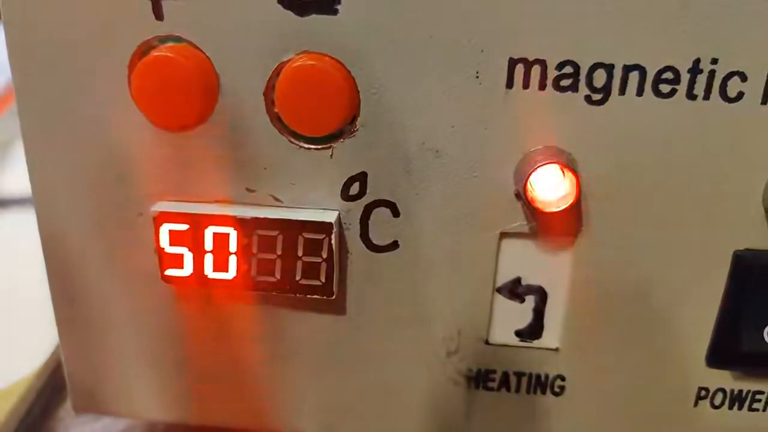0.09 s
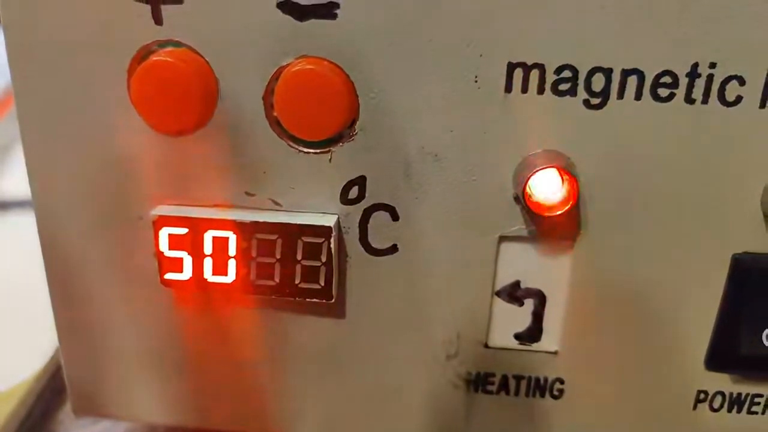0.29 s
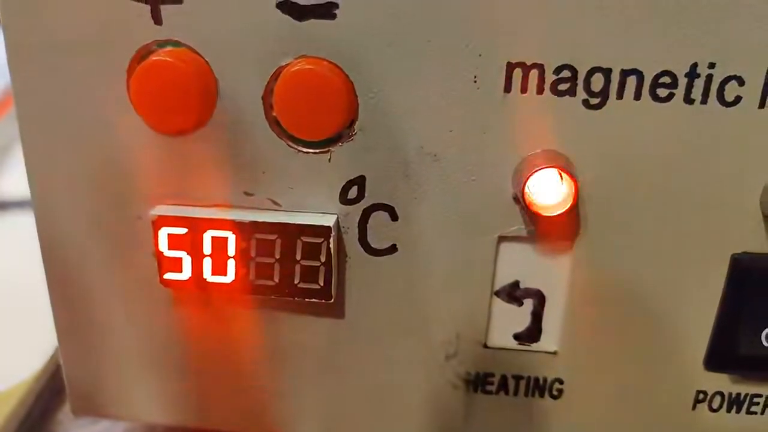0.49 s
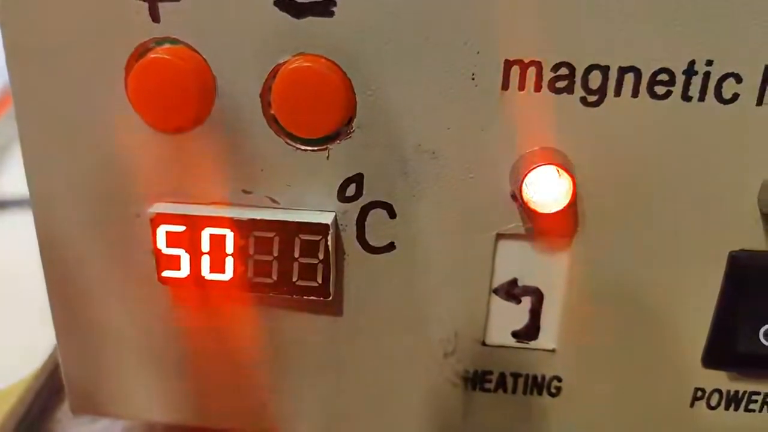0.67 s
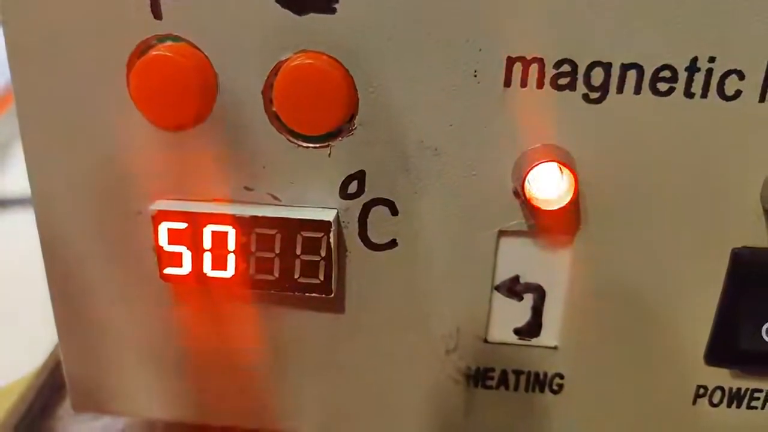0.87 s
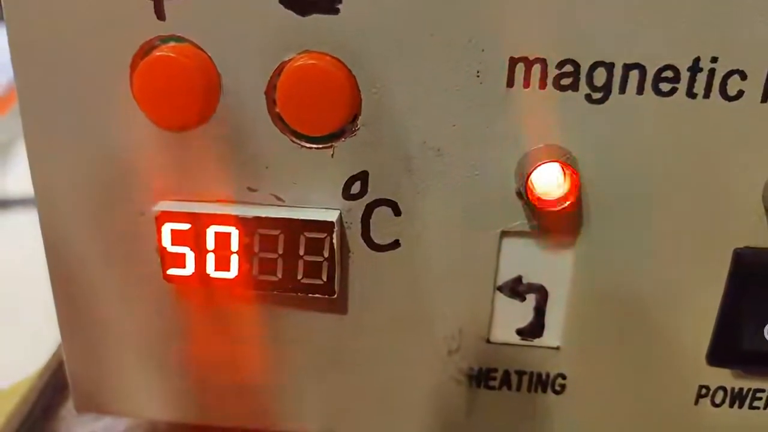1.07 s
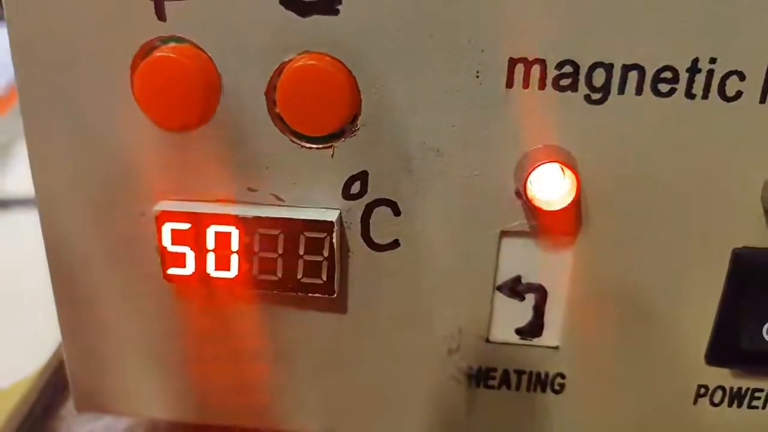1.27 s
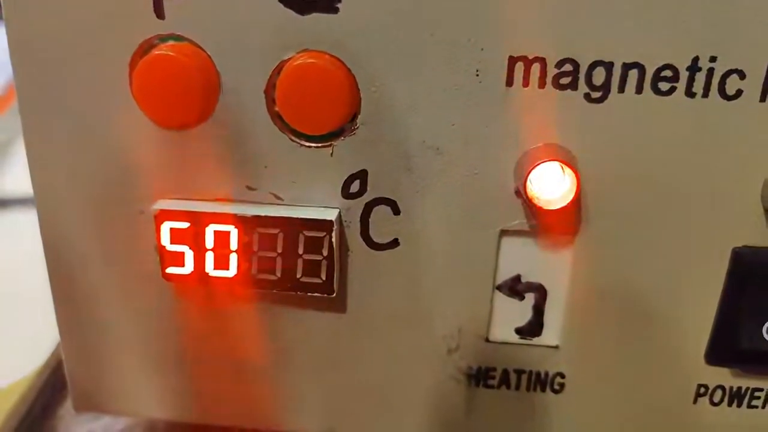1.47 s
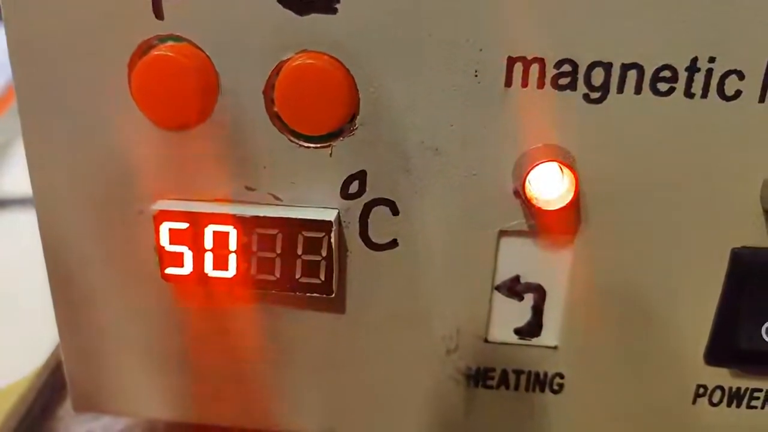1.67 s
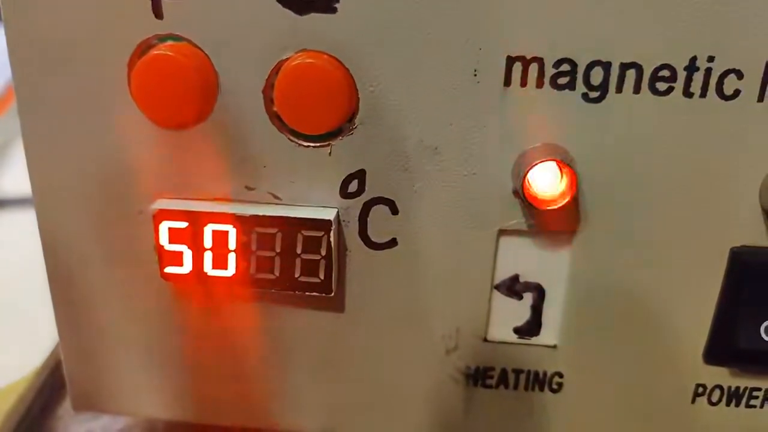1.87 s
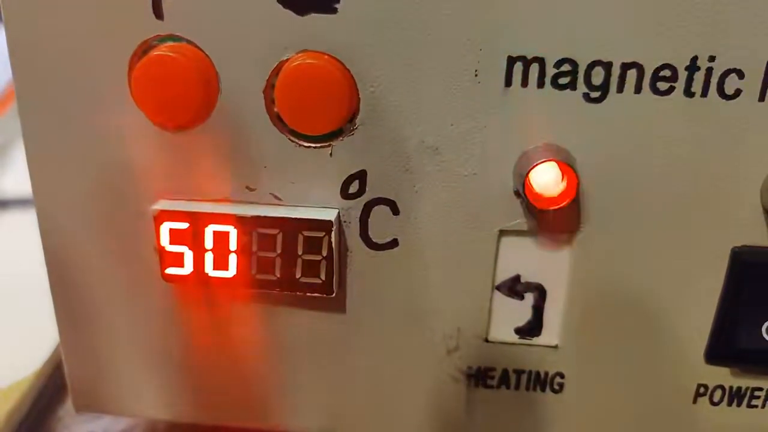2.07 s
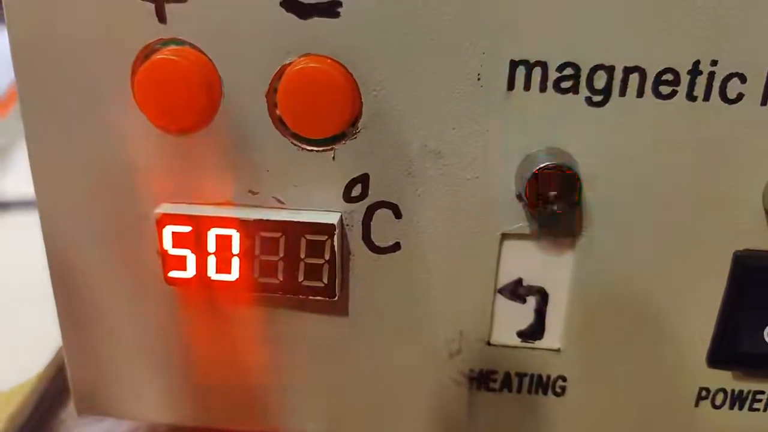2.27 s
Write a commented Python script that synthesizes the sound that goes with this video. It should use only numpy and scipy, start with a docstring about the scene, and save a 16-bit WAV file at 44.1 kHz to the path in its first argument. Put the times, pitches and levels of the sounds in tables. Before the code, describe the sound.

Close stereo pickup of a relay chattering in a heater controller: sparse ticks first, quickly thickening into a dense dry rattle, stopping near the end, with quiet motor hum and whirr underneath indoors.

```python
"""A relay in a heater controller's metal case ticks faintly, clicks a few times, then chatters in a rapid run.
Sharp ticks and longer bursts are random bounces ringing the relay's bright resonances; each also knocks
the case's duller resonances. Under them a motor hums in low sine lines and whirrs in two narrow noise bands,
over banded background noise. The clicks leave a short noise tail for the small room, all in stereo."""
import sys
import numpy as np
from scipy import signal
from scipy.io import wavfile
from scipy.ndimage import uniform_filter1d

SR = 44100
rng = np.random.default_rng(int(sys.argv[2]) if len(sys.argv) > 2 else 0)


def wav_record(signal):
    """Record a signal, one row per channel, as 16-bit PCM in the file named by sys.argv[1]."""
    frames = np.transpose(np.atleast_2d(signal))
    bounded = np.clip(frames, -1, 1)
    # unit amplitude maps onto the largest positive 16-bit level
    quanta = np.round(bounded * 32767).astype(np.int16)
    wavfile.write(sys.argv[1], SR, quanta)


N = 101430  # length in samples
STRENGTH_SPREAD_DB = 2  # each contact favours other resonances


def from_db(db):
    """Amplitude gain of a level in dB."""
    return 10 ** (np.asarray(db) / 20)


def rms_one(x):
    """Scale to rms 1."""
    return x / np.sqrt(np.mean(x ** 2) + 1e-20)


def at_hz(points, hz):
    """Read a table between its points on a log-frequency axis."""
    table_hz, values = np.array(points).T
    return np.interp(np.log(hz), np.log(table_hz), values)


def drift(rate_hz):
    """Slow random wander of rms 1: noise through a double low-pass pole, computed at every 40th sample."""
    step, settle = 40, 2000
    pole = np.exp(-2 * np.pi * rate_hz * step / SR)
    noise = rng.standard_normal(N // step + settle + 2)
    slow = signal.lfilter([1], [1, -2 * pole, pole * pole], noise)[settle:]
    return np.interp(np.arange(N) / step, np.arange(len(slow)), rms_one(slow))


def resonance(x, hz, width_hz):
    """Two-pole band-pass with a gain of about 1 at its peak."""
    r = np.exp(-np.pi * width_hz / SR)
    feedback = [1, -2 * r * np.cos(2 * np.pi * hz / SR), r * r]
    return signal.lfilter([(1 - r * r) / 2, 0, (r * r - 1) / 2], feedback, x + 1e-18)


def pair(alike, pan_db, mid, side):
    """Left and right from a shared and an opposed part; a positive pan leans left."""
    alike = np.clip(alike, 0, 1)
    pan = from_db([[pan_db / 2], [-pan_db / 2]])
    stereo = np.sqrt(1 + alike) * mid + np.sqrt(1 - alike) * side * [[1], [-1]]
    return pan * stereo / np.sqrt(1 + alike)


def relay():
    """Contacts meet in sharp ticks and bouncing bursts, each a bright click and a knock of the case."""
    # sharp ticks of the contacts meeting: start_s, level_db
    ticks = [(0.0072, -43.5), (0.1396, -48.5), (0.237, -23.5), (0.2387, -26.5), (0.313, -20.5),
             (0.319, -26.5), (0.4044, -21.5), (0.4111, -28), (0.5343, -22), (0.5464, -22), (0.6037, -22),
             (0.6158, -25), (0.6236, -20), (0.6394, -27.5), (0.6927, -20.5), (0.6974, -22.5), (0.7254, -21),
             (0.7355, -20.5), (0.737, -34), (0.7564, -23), (0.7587, -20), (0.7598, -25), (0.8195, -24.5),
             (0.8249, -20), (0.8373, -26), (0.8421, -27), (0.8514, -18), (0.864, -17.5), (0.8982, -25),
             (0.9094, -19), (0.9548, -29), (0.9568, -18.5), (0.9648, -23.5), (0.9858, -28), (0.9925, -34),
             (1.0231, -22), (1.0318, -16), (1.0379, -19), (1.04, -22), (1.0633, -18.5), (1.1092, -18.5),
             (1.1145, -20), (1.122, -20), (1.128, -27), (1.1392, -20), (1.1544, -23), (1.1598, -16.5),
             (1.1756, -17.5), (1.1999, -22), (1.211, -19.5), (1.2619, -26), (1.2891, -26), (1.2941, -22),
             (1.3148, -21), (1.33, -24.5), (1.356, -18), (1.3806, -29), (1.3831, -16), (1.4075, -23),
             (1.4173, -25), (1.4213, -19), (1.4357, -23), (1.441, -16.5), (1.4789, -35), (1.4796, -17),
             (1.491, -30), (1.512, -26), (1.5472, -20.5), (1.6039, -19), (1.609, -21), (1.6191, -27),
             (1.6219, -16.5), (1.6345, -26.5), (1.6571, -19.5), (1.685, -20), (1.687, -28), (1.6941, -17.5),
             (1.7058, -19.5), (1.748, -18.5), (1.7615, -21.5), (1.7785, -29), (1.7804, -17.5),
             (1.7822, -34), (1.7962, -19.5), (1.8053, -24), (2.0005, -18.5)]
    # bursts of bouncing: peak_s, level_db, fall_ms (limited below)
    bursts = [(0.2484, -34, 8.1), (0.3694, -32, 7.2), (0.4075, -37.5, 10.4), (0.4618, -31.5, 13.2),
              (0.508, -39.5, 12), (0.536, -30.5, 7.3), (0.5568, -31, 9.3), (0.601, -29, 14.5),
              (0.639, -31.5, 15), (0.664, -27.5, 8.5), (0.693, -33.5, 9.1), (0.727, -29, 7.7),
              (0.788, -31.5, 13.0), (0.7975, -29, 22), (0.8201, -25.5, 14.5), (0.845, -31, 13.0),
              (0.861, -29.5, 11.6), (0.8815, -30.5, 6.1), (0.8965, -32, 12), (0.907, -33, 3.5),
              (0.9271, -28.5, 3.2), (0.9424, -32, 18), (0.9853, -29, 18), (1.0057, -31.5, 10),
              (1.0215, -31, 15), (1.0384, -31.5, 12), (1.055, -25, 2.3), (1.059, -31, 11),
              (1.1153, -29, 14), (1.1332, -29.5, 5.7), (1.157, -31, 15), (1.1813, -28, 4.2),
              (1.196, -30.5, 7.9), (1.245, -31, 12), (1.2596, -30.5, 6.8), (1.2776, -26, 6.1),
              (1.294, -28.5, 13.6), (1.3116, -34, 8.8), (1.326, -28.5, 7), (1.3566, -29.5, 16),
              (1.376, -34.5, 14.5), (1.4076, -28, 12.3), (1.4343, -27.5, 9.1), (1.4395, -42, 13.0),
              (1.481, -30.5, 9.7), (1.5126, -30, 13.2), (1.5457, -27, 4.4), (1.5581, -22.5, 3.6),
              (1.6, -36, 17), (1.632, -31, 7.2), (1.657, -31.5, 14.4), (1.6774, -27, 2.4),
              (1.6846, -33.5, 13.6), (1.7319, -21, 3), (1.7493, -30.5, 12.8), (1.7988, -28, 9.7),
              (1.822, -31, 13.0), (1.8633, -31, 9.4), (1.8855, -30.5, 16.5), (1.9208, -31, 8),
              (1.959, -31, 7.6), (1.999, -34, 3.9), (2.0096, -29.5, 4.7), (2.044, -32, 7.3),
              (2.1133, -48.5, 8.2)]
    tick_fall_ms = 0.88
    events = [(s, db, tick_fall_ms) for s, db in ticks] + bursts
    times_s, level_db, fall_ms = np.transpose(events)
    fall_s = np.clip(fall_ms, 0.3, 15) / 1000
    is_tick = np.arange(len(times_s)) < len(ticks)
    return click(times_s, level_db, fall_s) + knock(times_s, level_db, fall_s, is_tick)


def click(times_s, level_db, fall_s):
    """Bounces ring the relay's bright parts and a very broad snap; the left side is a moment late."""
    # bright resonances of the relay: pitch_hz, width_hz, level_db
    relay_modes = [(3083, 382, -6.5), (3584, 101, -1.5), (4062, 158, -4), (4803, 302, -1), (5892, 363, 4.5),
                   (8010, 516, -2.5), (9410, 386, 1), (10150, 340, -8), (12400, 1430, -2.5),
                   (14100, 300, -4), (14750, 810, -3)]
    snap = (8900, 16600, -13)  # pitch_hz, width_hz, level_db
    left_lag_s = 0.00007
    ringing = struck(times_s, level_db, fall_s, relay_modes + [snap])
    stereo = pair(0.2, 2, *ringing)
    stereo[0] = np.roll(stereo[0], int(left_lag_s * SR))
    return signal.sosfilt(signal.butter(2, 2900, "high", fs=SR, output="sos"), stereo)


def knock(times_s, level_db, fall_s, is_tick):
    """The case rings just after each contact: one late blow per tick, a run of bounces per burst."""
    # resonances of the case: pitch_hz, width_hz, level_db
    case_modes = [(329.5, 69, -9.5), (605, 64, -9), (822, 64, 1.5), (1026, 134, -2.5), (1307, 47, -14),
                  (1672, 238, -12)]
    burst_below_db, burst_lag_s = 8.5, 0.00048
    tick_below_db, tick_lag_s = 11.5, 0.002986
    # hard clicks knock the case little more than soft ones
    knee_db, squeeze = -33.5, 0.69
    level_db = level_db - squeeze * np.maximum(level_db - knee_db, 0)
    is_burst = ~is_tick
    burst_knock = struck(times_s[is_burst] + burst_lag_s, level_db[is_burst] - burst_below_db,
                         fall_s[is_burst], case_modes)
    tick_knock = blows(times_s[is_tick] + tick_lag_s, level_db[is_tick] - tick_below_db, case_modes)
    return pair(0.74, 7, *(burst_knock + tick_knock))


def struck(times_s, levels_db, fall_s, modes):
    """Tiny random bounces, swelling and dying around each time, ring the modes; two unrelated versions."""
    bounces_per_s, bounce_spread_db = 9000, 2
    rattle_db, rattle_fall_s = -23, 0.018  # a weaker rattle after each contact
    rise_s = 0.44 * fall_s[:, None]  # the rise is shorter than the fall
    lead = SR // 50
    t = np.arange(-lead, 2 * lead) / SR
    at = (times_s * SR).astype(int)[:, None] + np.arange(len(t))

    # power envelope of each contact
    main = np.exp(-(t / np.where(t < 0, rise_s, fall_s[:, None])) ** 2)
    rattle = np.exp(-(t / np.where(t < 0, rise_s, rattle_fall_s)) ** 2)
    shape = main + from_db(2 * rattle_db) * rattle

    bounces = (rng.random((2, N)) < bounces_per_s / SR) * rng.choice([-1, 1], (2, N))
    bounces = rms_one(bounces * from_db(bounce_spread_db * rng.exponential(1, (2, N))))
    favour_db = rng.normal(0, STRENGTH_SPREAD_DB, (len(times_s), len(modes)))
    out, norm = 0, 0
    for k, (hz, width_hz, db) in enumerate(modes):
        contact_power = from_db(2 * (levels_db + favour_db[:, k]))[:, None] * shape
        power = np.bincount(at.ravel(), contact_power.ravel(), N + SR)[lead:N + lead]
        # neighbouring modes ring with opposite sign
        out = out + (-1) ** k * from_db(db) * resonance(bounces * np.sqrt(power), hz, width_hz)
        norm += from_db(2 * db) * np.pi * width_hz / SR
    return out / np.sqrt(norm)


def blows(times_s, levels_db, modes):
    """Single impulses ring the modes, each with a strength of its own; two unrelated versions."""
    strength = from_db(rng.normal(0, STRENGTH_SPREAD_DB, (len(times_s), 2, len(modes))))
    strength = strength * rng.choice([-1, 1], (len(times_s), 2, 1))
    out = 0
    for k, (hz, width_hz, db) in enumerate(modes):
        impulses = np.zeros((2, N))
        impulses[:, (times_s * SR).astype(int)] = from_db(levels_db + db) * strength[:, :, k].T
        out = out + (-1) ** k * resonance(impulses, hz, width_hz) * SR / (2 * np.pi * width_hz)
    return out


def room(x):
    """A dense tail of reflections, its own on each side, dulled by the walls."""
    t60_s, level_db, cut_hz = 0.3, -16.5, 5700
    t = np.arange(SR // 2) / SR
    tail = rng.standard_normal((2, len(t))) * from_db(-60 * t / t60_s)
    tail = tail * (t > 0.003)  # short gap before the reflections
    tail = signal.lfilter(*signal.butter(1, cut_hz, fs=SR), tail)
    tail = tail / np.sqrt(np.sum(tail ** 2, 1, keepdims=True))
    return from_db(level_db) * signal.fftconvolve(x, tail, axes=1)[:, :N]


def chatter_swell(clicks):
    """Rise in dB of the hum and low rumble with the click power, averaged twice over a sliding window."""
    max_swell_db, window_s, half_swell_db = 8.5, 0.29, -35
    window = int(window_s * SR)
    power = np.mean(clicks ** 2, 0)
    power = uniform_filter1d(uniform_filter1d(power, window), window)
    return max_swell_db * power / (power + from_db(2 * half_swell_db))


def hum(swell_db):
    """Wavering sine lines at and above the motor's turning rate, leaning left."""
    # lines of the motor: multiple of the turning rate [ratio], level_db
    hum_lines = [(1, 0.4), (3.02, -9), (4.77, -17), (40.1, -23)]
    turns_per_s, base_db, waver_db, pan_db = 18.8, -55, 0.9, 8
    t = np.arange(N) / SR
    lines = 0
    for multiple, db in hum_lines:
        phase = 2 * np.pi * (multiple * turns_per_s * t + rng.random())
        lines = lines + from_db(db + waver_db * drift(11)) * np.sin(phase)
    pan = from_db([[pan_db / 2], [-pan_db / 2]])
    return np.sqrt(2) * from_db(base_db + swell_db) * lines * pan


def whirr():
    """Two narrow bands of hiss from the motor that flutter between louder and softer."""
    width_hz, base_db, flutter_db = 170, -68, 7.5
    band = 0
    for hz in [3226, 3580]:
        narrow = resonance(rng.standard_normal((2, N)), hz, width_hz)
        band = band + resonance(narrow, hz, 2 * width_hz)
    flutter = np.tanh(2 * drift(50))  # mostly near one extreme or the other
    return from_db(base_db + flutter_db * flutter) * pair(0.1, 5, *rms_one(band))


def floor(swell_db):
    """Air and motor noise in patchy third-octave bands; those below 500 Hz swell with the hum."""
    # base spectrum of the noise: pitch_hz, level_db [dB per Hz]
    floor_levels = [(50, -93.5), (120, -87), (420, -95.5), (700, -94.5), (1000, -102), (2500, -111),
                    (3300, -104), (4900, -107), (6300, -112), (8200, -107), (10000, -115), (12500, -110)]
    # stereo likeness of the noise: pitch_hz, left-right likeness [0 to 1]
    floor_alike = [(640, 0.58), (1400, 0.16)]
    patchy_db, pan_db = 4, 5
    edges_hz = 22 * 2 ** np.arange(0, 9.7, 1 / 3)
    white = rng.standard_normal((2, 2, N))  # neighbouring bands take turns between two noises
    out = 0
    for k, (low, high) in enumerate(zip(edges_hz, edges_hz[1:])):
        band = signal.sosfilt(signal.butter(2, [low, high], "band", fs=SR, output="sos"), white[k % 2])
        hz = np.sqrt(low * high)
        level_db = at_hz(floor_levels, hz) + patchy_db * drift(32) + swell_db * (hz < 500)
        out = out + from_db(level_db) * pair(at_hz(floor_alike, hz), pan_db, *band)
    return np.sqrt(SR / 2) * out


def scene():
    """Relay in the room over hum, whirr and background noise."""
    clicks = relay()
    swell_db = chatter_swell(clicks)
    return clicks + room(clicks) + hum(swell_db) + floor(swell_db) + whirr()


def record(dry):
    """A steep low-pass takes off the top, 60 dB down from 16450 Hz upward."""
    return signal.sosfilt(signal.cheby2(14, 60, 16450, fs=SR, output="sos"), dry)


dry = scene()
out = record(dry)
wav_record(out)
```